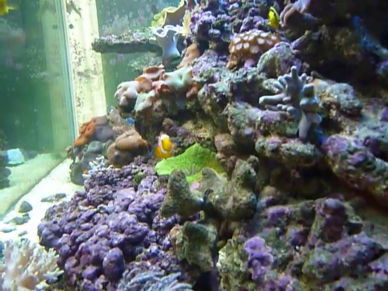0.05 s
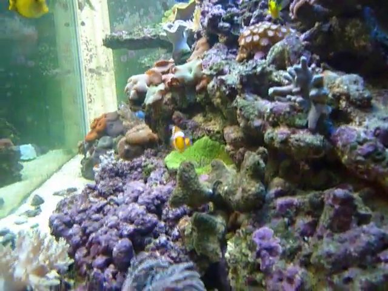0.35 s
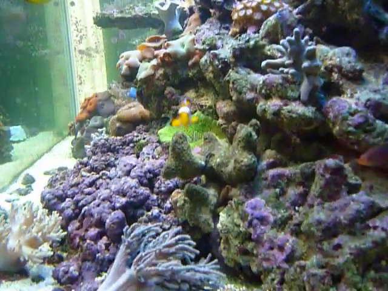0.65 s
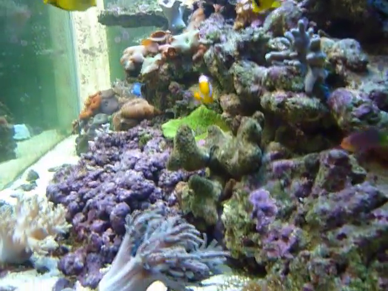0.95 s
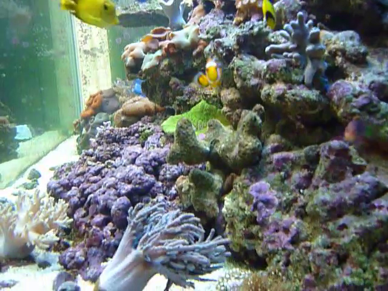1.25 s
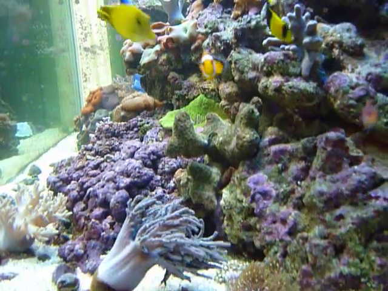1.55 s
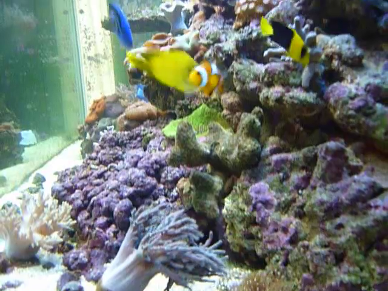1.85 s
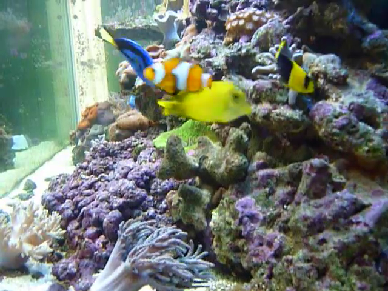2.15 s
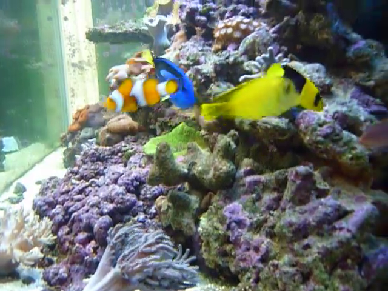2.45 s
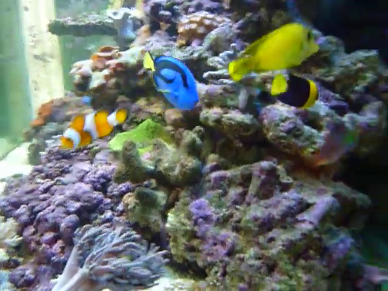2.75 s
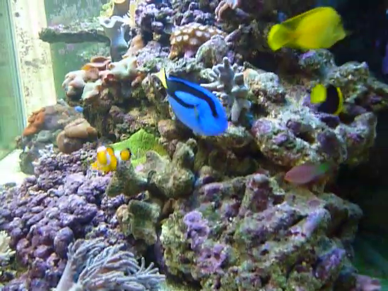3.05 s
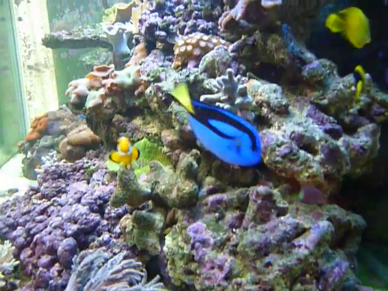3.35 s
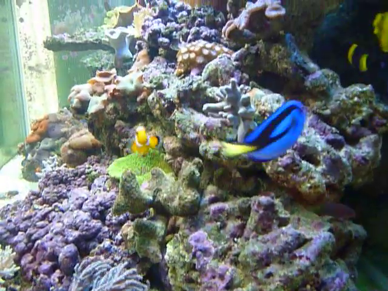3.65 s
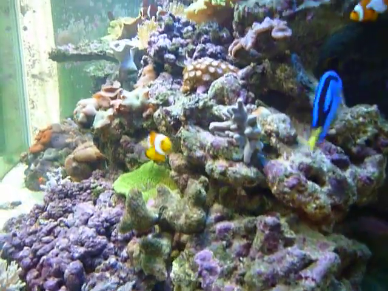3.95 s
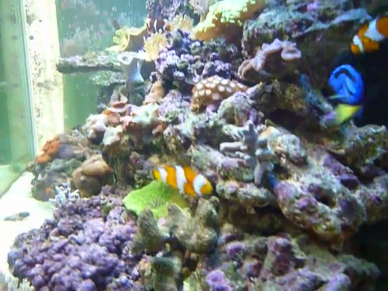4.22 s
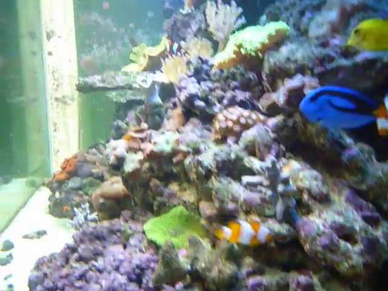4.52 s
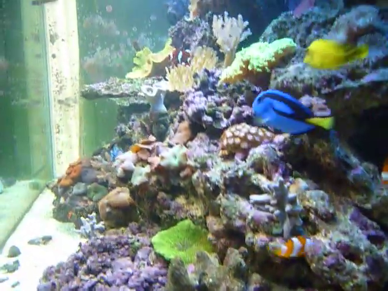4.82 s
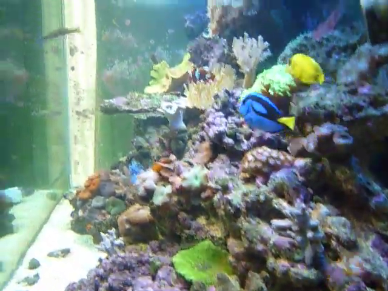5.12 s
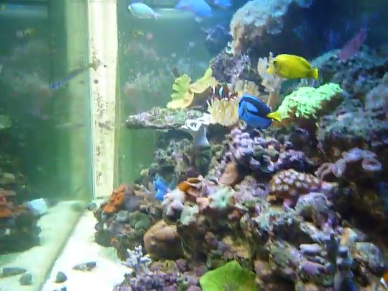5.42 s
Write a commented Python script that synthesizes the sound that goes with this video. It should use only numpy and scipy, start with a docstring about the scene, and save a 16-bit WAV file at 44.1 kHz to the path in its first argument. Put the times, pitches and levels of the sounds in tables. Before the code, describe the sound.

Small bubbles plop irregularly over the low, steady hum of fish tank pumps and a soft wash of water.

```python
"""Mains-driven pumps of a reef aquarium drone through tank and cabinet, heard just outside the glass.
Free-running rotors beat against the drone; an impeller buzzes faintly, one chatter per turn.
Turbulent water rushes and rings the tank. Bubbles plop in the overflow, with short room reflections.
Fine spray ticks and electronics whine thinly."""
import sys
import numpy as np
from scipy import signal
from scipy.fft import rfft, irfft
from scipy.io import wavfile
from scipy.ndimage import uniform_filter1d

SR = 44100
rng = np.random.default_rng(int(sys.argv[2]) if len(sys.argv) > 2 else 0)


def wav_record(signal):
    """Record a signal, one row per channel, as 16-bit PCM in the file named by sys.argv[1]."""
    frames = np.transpose(np.atleast_2d(signal))
    bounded = np.clip(frames, -1, 1)
    # unit amplitude maps onto the largest positive 16-bit level
    quanta = np.round(bounded * 32767).astype(np.int16)
    wavfile.write(sys.argv[1], SR, quanta)


N = 250488
TIME_S = np.arange(N) / SR
RING_CYCLES = 56  # bubble decay to -60 dB: low ones ring longer

# electronic whine: f/Hz, level/dB
WHINE_TONES = [(4810.5, -89), (5397.8, -72.5), (6222.2, -85.5), (6666.7, -82)]
# impeller buzz envelope: f/Hz, level/dB per harmonic
BUZZ_SPECTRUM = [(2300, -88), (2650, -85), (2860, -80), (3060, -86), (3250, -88), (3450, -83),
                 (3800, -98.5)]
# water and room noise: f/Hz, relative density/dB
RUSH_SPECTRUM = [(20, -31), (50, -25.5), (90, -17), (150, -12), (230, -9.5), (330, -7), (420, -11.5),
                 (570, -13), (750, -12), (1100, -17), (1650, -21.5), (2150, -26.5), (3000, -28.5),
                 (4400, -35), (6700, -36.5), (8000, -43)]
# tank and cabinet resonances: f/Hz, width/Hz, lift/dB
TANK_MODES = [(148, 12, 9), (192, 24, 5), (280, 26, 6), (310, 12, 7), (357, 43, 5), (465.5, 18, 6.5),
              (487.6, 22, 5.5), (637, 29, 7), (721, 66, 3.5), (954, 23, 3), (1460, 80, 4)]
# ring of a bubble and the water around it: f/pitch, relative level/dB
BUBBLE_MODES = [(0.799, -21.5), (1, 0), (1.18, -10.5)]
# clear spray ticks: t/s, peak before trim/dB, f/Hz
SPRAY_TICKS = [(0.5606, -47, 5900), (.6846, -51, 7000), (2.4012, -55, 6500), (3.1056, -54, 7000),
               (5.2497, -53, 7000), (5.2766, -54, 7000)]
# water spurts: t/s, length/s, level/dB per bubble, f/Hz
SPURT_EVENTS = [(0.008, 0.016, -59, 2940), (0.054, .06, -57, 2640), (4.243, .05, -47, 1950)]
# clear overflow bubbles: t/s, peak before trim/dB, f/Hz
OVERFLOW_PLOPS = [(.343, -45, 1620), (0.507, -45, 1450), (.625, -39, 1476), (.772, -37.5, 734),
                  (.811, -41, 1495), (1.118, -40.5, 1500), (1.306, -43, 1450), (1.399, -40.5, 1460),
                  (1.515, -33, 1495), (1.846, -40.5, 1486), (2.22, -36, 1484), (2.548, -39.5, 1490),
                  (2.8057, -36, 1480), (2.923, -39.5, 1490), (3.0404, -35.5, 1506), (3.066, -43, 1480),
                  (3.23, -42, 1460), (3.30, -39, 1486), (3.488, -39, 1475), (3.5795, -34.6, 1500),
                  (3.721, -39, 1465), (3.911, -39, 1480), (3.979, -38, 1650), (4.1893, -36.5, 1484),
                  (4.39, -36.5, 301), (4.537, -38, 737), (4.576, -34, 298), (5.29, -42, 1500)]
# rotor tones, not mains-locked: f/Hz, level/dB
ROTOR_TONES = [(127.9, -65), (186.6, -55), (213.2, -67.5), (298.6, -53), (319.9, -60), (534.3, -65.5),
               (559.9, -65), (746.3, -61), (895.6, -75.5), (932.7, -69.5), (1023.5, -67), (1194.1, -66)]
# swell of a faint singing tone: t/s, level/dB
SINGING_LEVEL = [(0, -65.5), (3.2, -71), (3.7, -62.5), (4.15, -58), (4.5, -62.5), (4.9, -74), (5.7, -63)]
# weaker pump tones: f/mains, level/dB
PUMP_HARMONICS = [(1, -82), (2, -56.5), (3, -51), (5, -55), (6, -61.5), (7, -66.5), (8, -58), (9, -59),
                  (10, -57.5), (13, -61.5), (14, -64), (16, -67.5), (17, -78.5), (21, -81), (27, -78)]
# main pump tone at the listener: t/s, level/dB
PUMP_LEVEL = [(0.05, -39.5), (.5, -38.5), (2.1, -38.5), (2.55, -41), (2.8, -39), (4.0, -39), (4.4, -41),
              (5.65, -42.5)]


def gain(db):
    """dB to amplitude."""
    return 10 ** (np.asarray(db) / 20)


def unit_rms(x):
    """Scale to rms 1."""
    return x / np.sqrt(np.mean(x ** 2) + 1e-20)


def spectrum_db(table, hz):
    """Interpolate a spectrum over log frequency."""
    table_hz, db = np.transpose(table)
    return np.interp(np.log(hz + 1), np.log(table_hz + 1), db)


def add(mix, start_s, sound):
    """Mix in a sound at start_s."""
    part = mix[max(round(start_s * SR), 0):][:len(sound)]
    part += sound[:len(part)]


def decay(t, t60_s):
    """Exponential fall, -60 dB at t60_s."""
    return np.exp(-np.log(1000) * t / t60_s)


def drift(rate_hz):
    """Slow noise up to about rate_hz, rms 1."""
    hz = np.fft.rfftfreq(N, 1 / SR)
    return unit_rms(irfft(rfft(rng.standard_normal(N)) * (hz > 0) / (1 + (hz / rate_hz) ** 4), N))


def tone(hz, shift_rad=0):
    """Sine of rms 1, random start phase."""
    return np.sqrt(2) * np.sin(2 * np.pi * (hz * TIME_S + rng.random()) + shift_rad)


def room(x, t60_s=.31, wet_db=-5, first_s=.003, echoes_per_s=2000):
    """Add scattered reflections from hood and walls."""
    t = np.arange(SR // 3) / SR
    taps = rng.choice([-1., 1.], len(t)) * (rng.random(len(t)) < echoes_per_s / SR) * (t > first_s)
    tail = taps * decay(t, t60_s)
    return x + gain(wet_db) * signal.fftconvolve(x, tail / np.linalg.norm(tail))[:N]


def whine():
    """Steady thin tones of the electronics."""
    return sum(gain(db) * tone(hz) for hz, db in WHINE_TONES)


def impeller(turn_hz=49.31, slip_s=4e-5):
    """One chatter per turn: a comb of faint high harmonics."""
    slip_rad_per_hz = 2 * np.pi * slip_s * drift(1.2)
    comb_hz = turn_hz * np.arange(47, 77)
    return sum(gain(spectrum_db(BUZZ_SPECTRUM, hz)) * tone(hz, hz * slip_rad_per_hz) for hz in comb_hz)


def water(level_db=-43.5, churn_db=.5, surge_db=.5, surge_hz=2.5, churn_top_hz=2000):
    """Turbulent flow rings the tank; the lows surge and churn, the hiss stays smooth."""
    hz = np.fft.rfftfreq(N, 1 / SR)
    modes_db = sum(db / (1 + (2 * (hz - mode_hz) / width_hz) ** 2) for mode_hz, width_hz, db in TANK_MODES)
    colour = gain(spectrum_db(RUSH_SPECTRUM, hz) + modes_db)
    rush = unit_rms(irfft(rfft(rng.standard_normal(N)) * colour, N))
    band_hz, frame_s, cells = signal.stft(rush, SR, nperseg=1024, noverlap=768)
    patches = uniform_filter1d(rng.standard_normal(cells.shape), size=12, axis=1)
    patches = unit_rms(uniform_filter1d(patches, size=7, axis=0))
    swing_db = churn_db * patches + surge_db * np.interp(frame_s, TIME_S, drift(surge_hz))
    cells *= gain(swing_db / (1 + (band_hz[:, None] / churn_top_hz) ** 4))
    return gain(level_db) * signal.istft(cells, SR, nperseg=1024, noverlap=768)[1][:N]


def plop(hz, t60_s, rise_cycles=1.613):
    """One bubble swells into its ring and dies away; peak 1."""
    t = np.arange(SR // 6) / SR
    envelope = (1 - np.exp(-(t * hz / rise_cycles) ** 2)) * decay(t, t60_s)
    cycles = hz * t - rise_cycles  # modes in phase at the end of the swell
    ring = envelope * sum(gain(db) * np.sin(2 * np.pi * ratio * cycles) for ratio, db in BUBBLE_MODES)
    return ring / abs(ring).max()


def swarm(count, level_db, spread_db, centre_hz, spread_oct, t60_s):
    """Bubbles at random times, scattered in level and pitch."""
    out = np.zeros(N)
    starts_s = rng.random(count) * N / SR
    for start_s, (strength, pitch) in zip(starts_s, rng.standard_normal((count, 2)).clip(-2, 2)):
        hz = centre_hz * 2 ** (spread_oct * pitch)
        add(out, start_s, gain(level_db + spread_db * strength) * plop(hz, t60_s))
    return out


def spray(t60_s=.006, trim_db=.5):
    """Tiny bubbles burst at the surface: some clear, the rest faint."""
    out = swarm(12, level_db=-59, spread_db=1.8, centre_hz=7060, spread_oct=.08, t60_s=t60_s)
    for start_s, db, hz in SPRAY_TICKS:
        add(out, start_s, gain(db + trim_db) * plop(hz, t60_s))
    return out


def spurts(t60_s=.04, bubbles_per_s=200, detune=.035):
    """Each spurt sheds bubbles of nearly one size: a short pitched gurgle."""
    out, t = np.zeros(N), np.arange(SR // 10) / SR
    for start_s, length_s, db, hz in SPURT_EVENTS:
        count = max(round(length_s * bubbles_per_s), 1)
        for k, (jitter, pitch) in enumerate(rng.uniform(-1, 1, (count, 2))):
            ring = decay(t, t60_s) * np.sin(2 * np.pi * hz * (1 + detune * pitch) * t)
            delay_s = length_s * (k + (jitter + 1) / 2) / count
            add(out, start_s + delay_s, gain(db) * ring)
    return out


def trickle(hz=1477):
    """Soft overflow plops of nearly one size, plus many small mixed bubbles."""
    soft = swarm(14, level_db=-45.5, spread_db=2, centre_hz=hz, spread_oct=.05, t60_s=RING_CYCLES / hz)
    mixed = swarm(170, level_db=-53.5, spread_db=2.8, centre_hz=1258, spread_oct=.4, t60_s=.03)
    return soft + mixed


def overflow(trim_db=-1, rise_cycles=2.267):
    """Single bubbles ring clearly, from low glugs to bright plops."""
    out = np.zeros(N)
    for start_s, db, hz in OVERFLOW_PLOPS:
        add(out, start_s, gain(db + trim_db) * plop(hz, RING_CYCLES / hz, rise_cycles))
    return out


def rotors(wander_rad=.45, wander_ref_hz=186.6, waver_db=1.9, singing_hz=1360):
    """Free-running rotors and a singing tone; water load sways phase and level."""
    singing_db = np.interp(TIME_S, *np.transpose(SINGING_LEVEL))
    out = np.zeros(N)
    for hz, db in [*ROTOR_TONES, (singing_hz, singing_db)]:
        load = drift(2.8)
        shift_rad = wander_rad * np.sqrt(hz / wander_ref_hz) * load
        out += gain(db + waver_db * load[::-1]) * tone(hz, shift_rad)
    return out


def pump(mains_hz=50, main_tone_hz=200, waver_db=.5):
    """Magnet drive shakes the tank at mains multiples; main tone level follows the listening spot."""
    main = gain(np.interp(TIME_S, *np.transpose(PUMP_LEVEL))) * tone(main_tone_hz)
    harmonics = sum(gain(db) * tone(order * mains_hz) for order, db in PUMP_HARMONICS)
    return (main + harmonics) * gain(waver_db * drift(5.9))


def scene():
    """Machinery and water, mono."""
    machines = pump() + rotors() + impeller() + whine()
    return (machines + water() + room(overflow() + trickle() + spurts()) + spray())[None]


def record(dry):
    """DC offset and treble cut."""
    dc_offset, cutoff_hz = -.0482, 8300
    lowpass = signal.firwin(161, cutoff_hz, window=("kaiser", 8), fs=SR)
    return signal.oaconvolve(dry + dc_offset, lowpass[None], "same")


dry = scene()
out = record(dry)
wav_record(out)
```